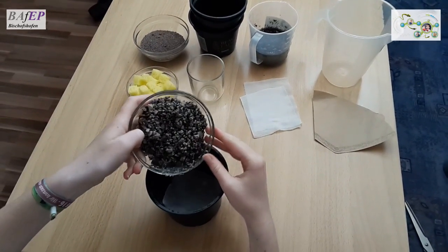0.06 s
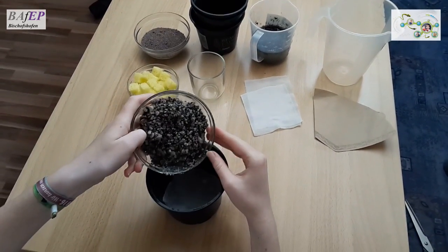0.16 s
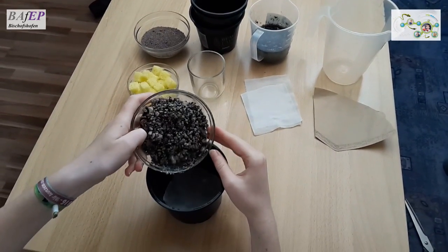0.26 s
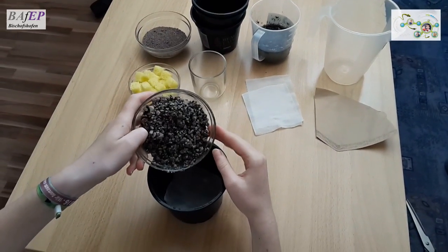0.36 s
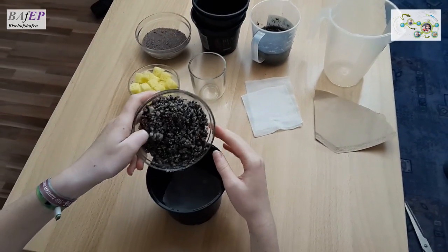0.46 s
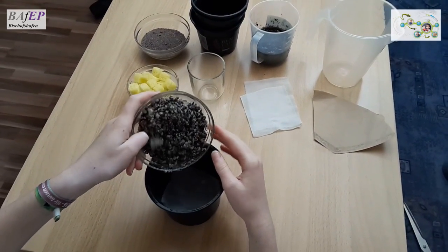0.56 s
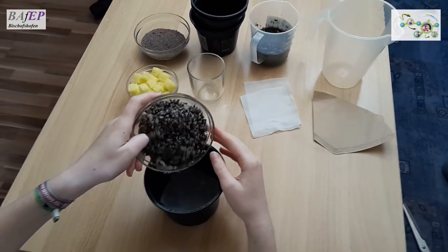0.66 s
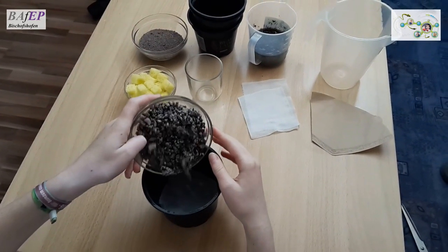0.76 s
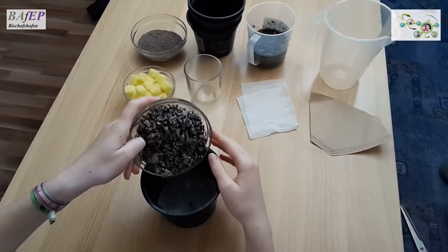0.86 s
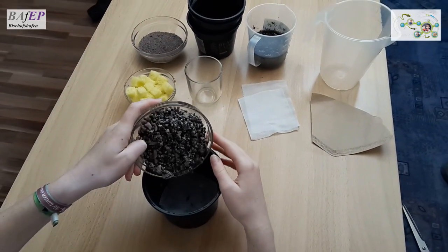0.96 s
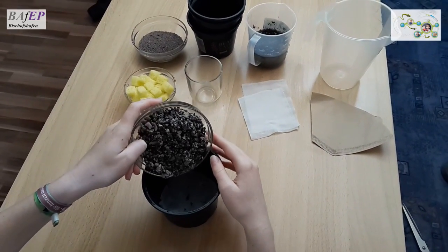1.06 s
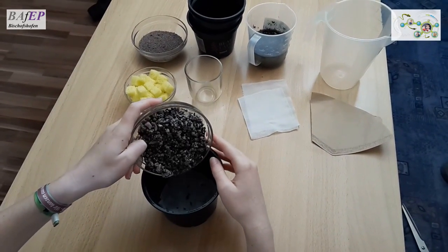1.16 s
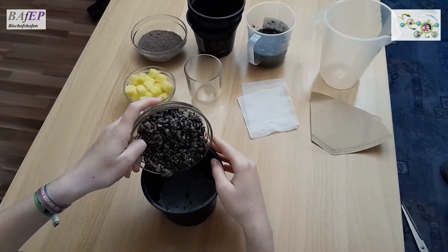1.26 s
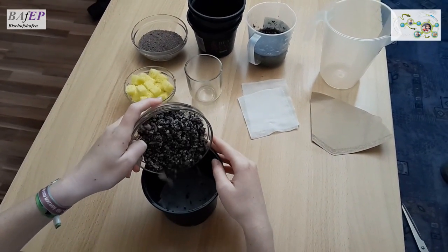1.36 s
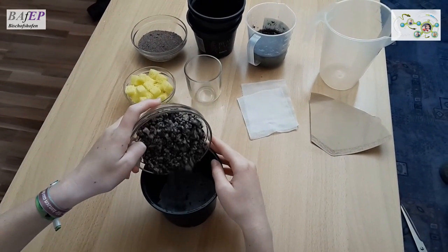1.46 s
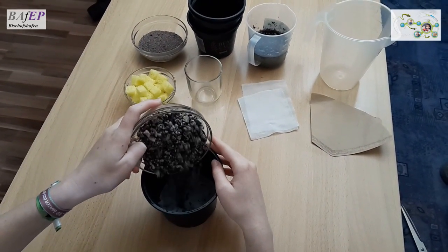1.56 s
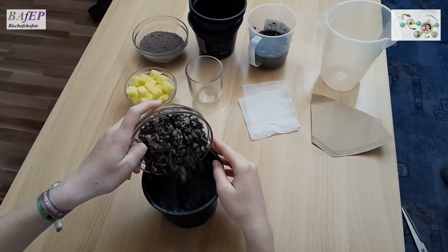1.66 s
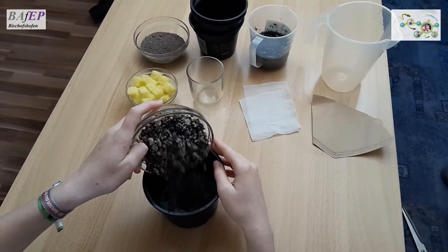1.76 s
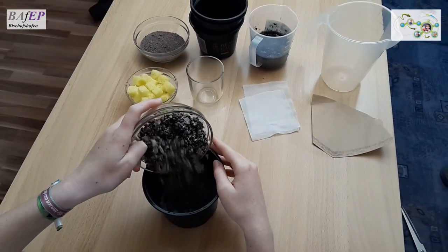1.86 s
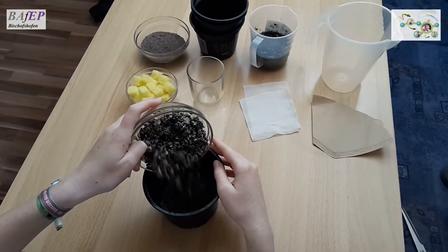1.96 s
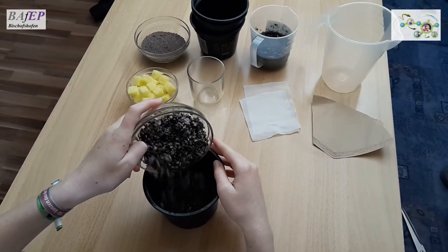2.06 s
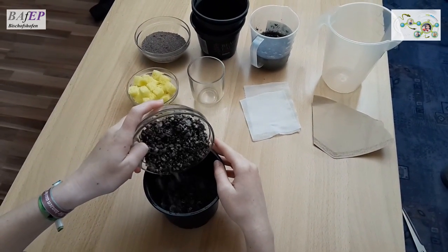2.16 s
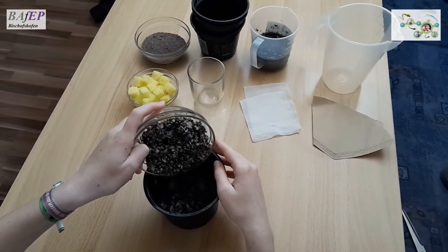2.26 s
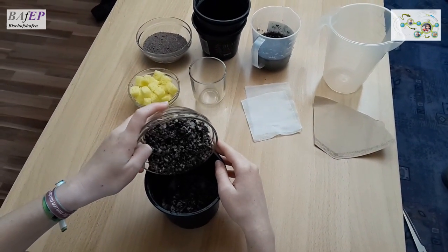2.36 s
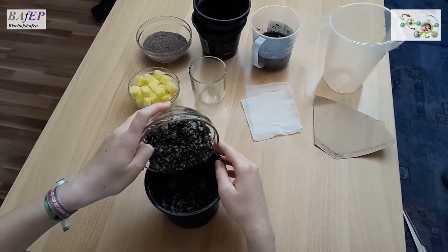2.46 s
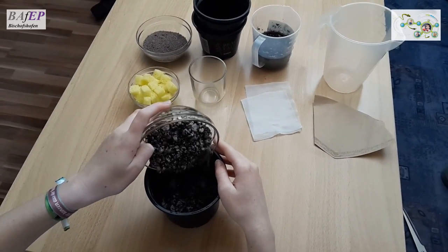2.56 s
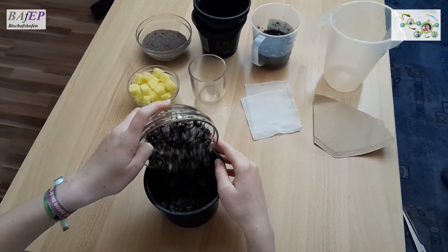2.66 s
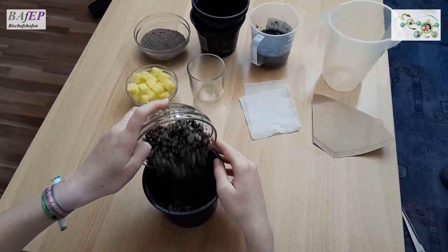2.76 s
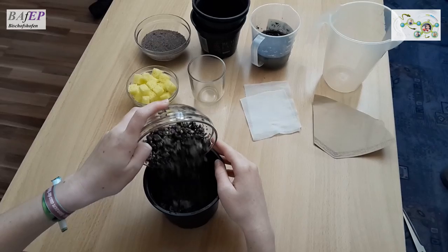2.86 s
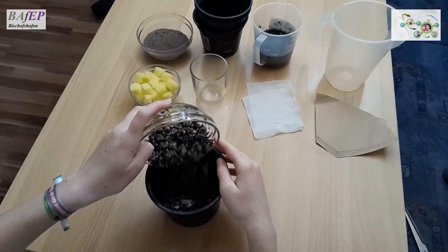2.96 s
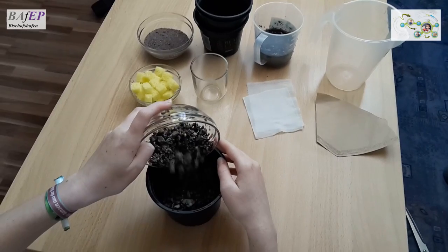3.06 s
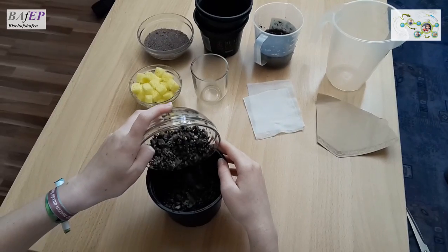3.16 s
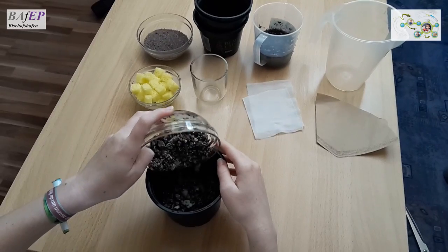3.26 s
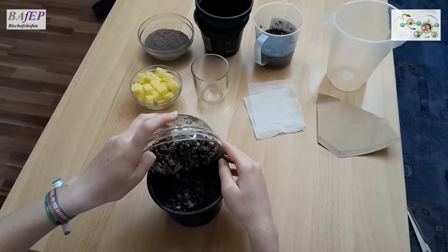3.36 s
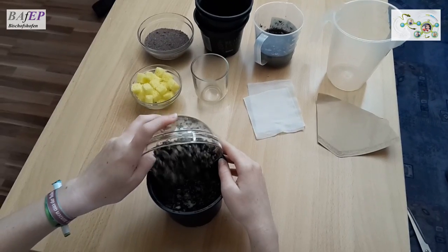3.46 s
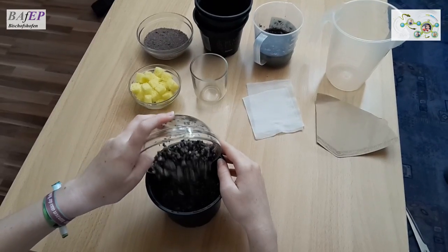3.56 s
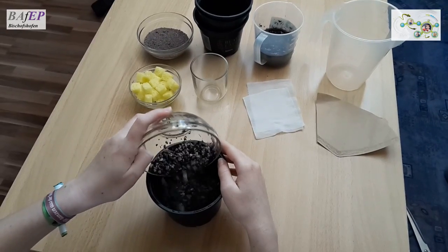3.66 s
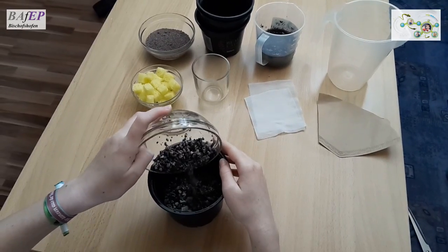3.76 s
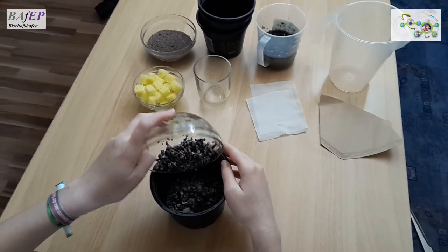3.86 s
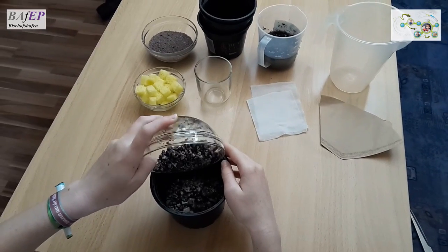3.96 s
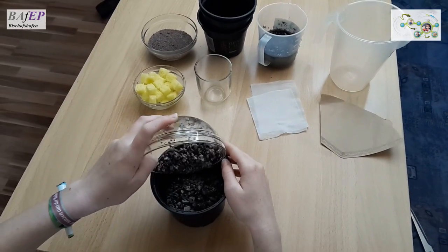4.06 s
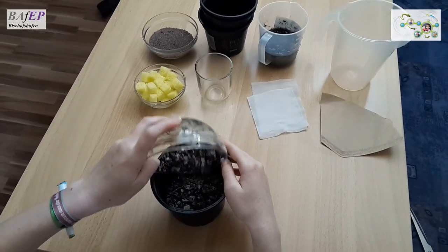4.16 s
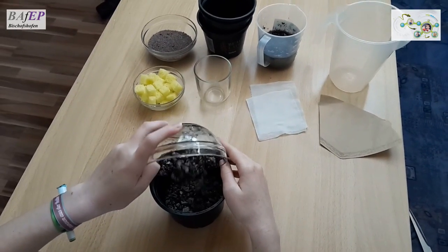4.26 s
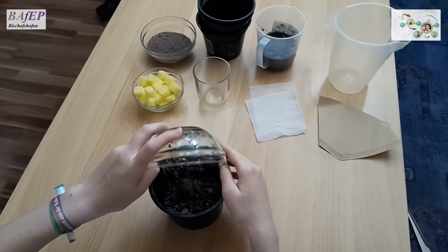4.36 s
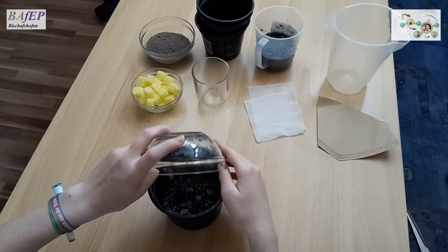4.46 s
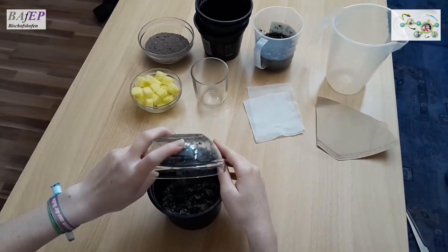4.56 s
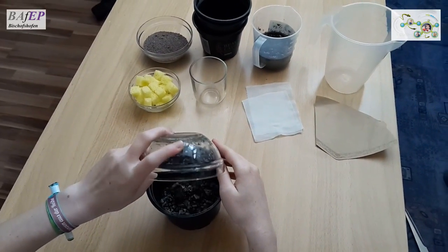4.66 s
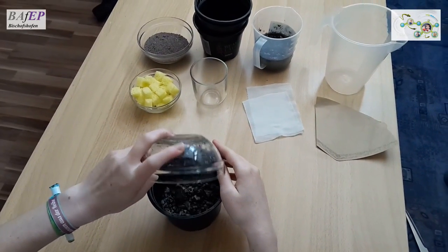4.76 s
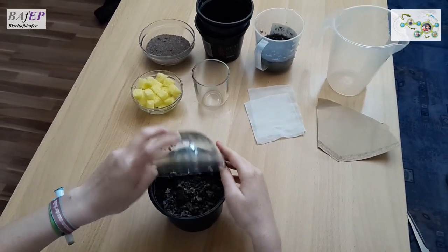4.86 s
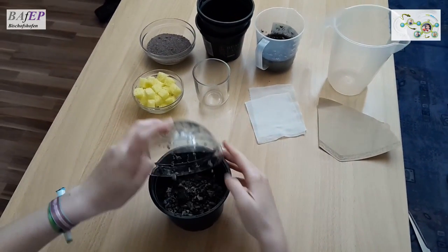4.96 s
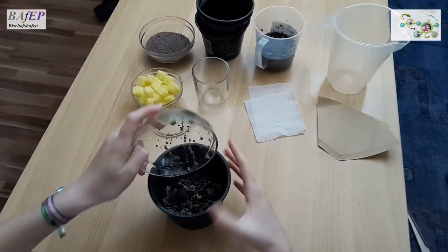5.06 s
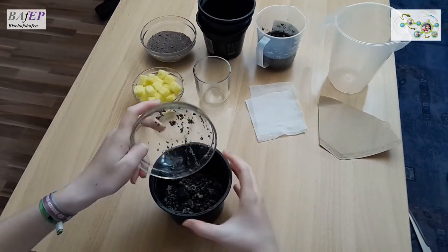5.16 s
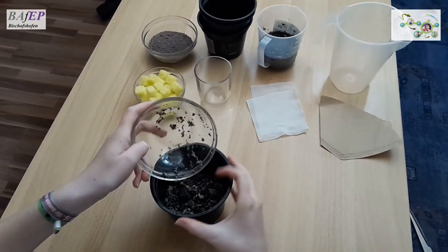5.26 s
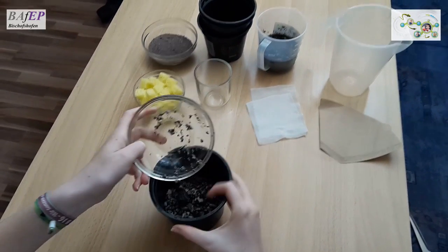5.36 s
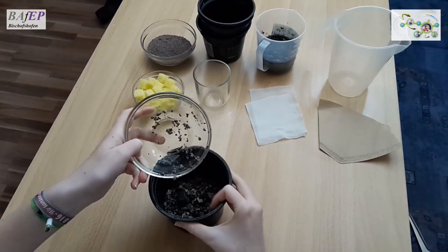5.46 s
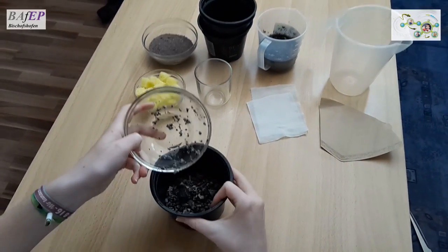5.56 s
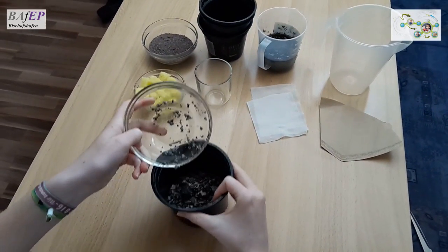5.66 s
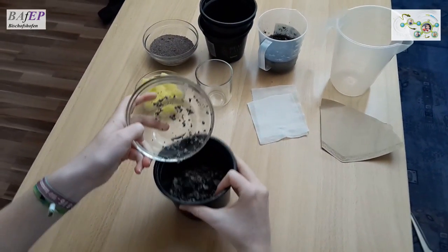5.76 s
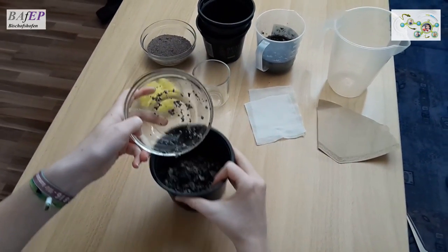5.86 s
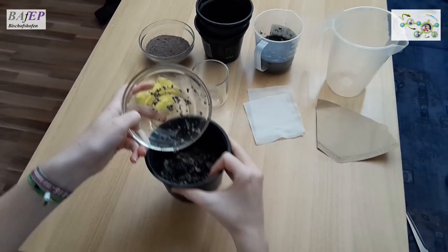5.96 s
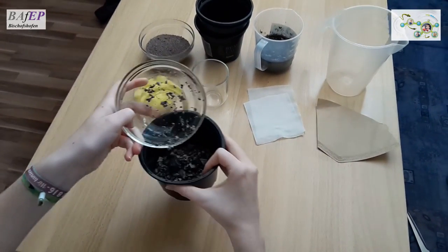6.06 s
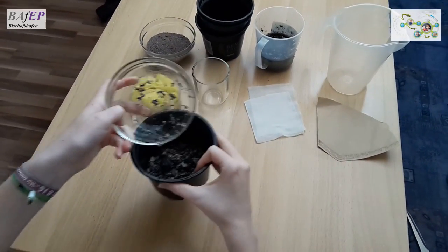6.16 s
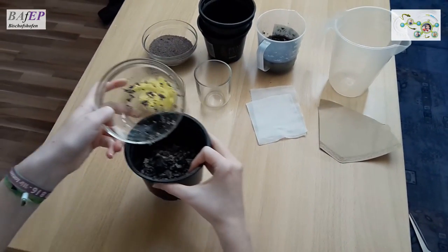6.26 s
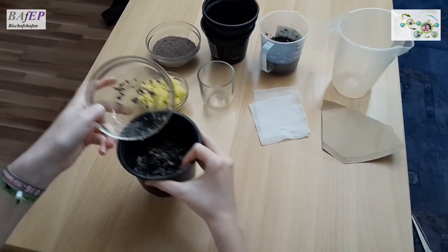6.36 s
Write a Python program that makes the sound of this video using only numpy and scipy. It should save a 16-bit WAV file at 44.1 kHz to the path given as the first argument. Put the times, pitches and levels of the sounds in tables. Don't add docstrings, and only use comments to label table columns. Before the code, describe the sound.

Dry little stones tick on glass, then clatter in waves into a hollow plastic pot on a table, thinning to a few last clicks.

```python
import sys
import numpy as np
from scipy import signal
from scipy.fft import rfft, irfft
from scipy.io import wavfile

SR = 44100
rng = np.random.default_rng(int(sys.argv[2]) if len(sys.argv) > 2 else 0)


def digitize_waveform(pressure):
    field = np.atleast_2d(pressure).T
    bounded = np.clip(field, -1, 1)
    quanta = np.round(bounded * 32767).astype(np.int16)
    wavfile.write(sys.argv[1], SR, quanta)


def rack_gain(trim_db):
    fader = np.asarray(trim_db, float)
    return 10 ** (fader / 20)


N = 282592

# pitch_hz [Hz], level_db [dB], t60_s [s], gained_db [dB] as the bowl empties
BOWL_MODES = [(3950, -17, .007, -7), (4260, -15, .013, -6.5), (4340, -12.5, 0.027, 3),
              (5400, -17, 0.002, -4), (6070, -12, 0.016, -2), (6380, -12, 0.012, -5),
              (6580, -4, 0.014, -2.5), (6710, -8.5, .025, 22.5), (8950, -21, .01, -8),
              (9280, -22, 0.031, 6)]
# pitch_hz [Hz], level_db [dB], t60_s [s]
POT_MODES = [(350, -8.5, 0.033), (472, -7.5, 0.01), (610.5, -8, 0.035), (699, -2.5, 0.021),
             (844, -2, 0.015), (1144, 1, 0.021), (1280, 5.5, 0.0061), (1575, 1.5, 0.016),
             (2070, -1.5, 0.046), (2160, 2.5, 0.022)]
LEFT_LEAD_S = 0.00019


def rms_one(x):
    return x / np.sqrt(np.mean(x ** 2) + 1e-30)


def at_hz(points, hz):
    points = np.array(points)
    return np.interp(np.log(hz), np.log(points[:, 0]), points[:, 1])


def drift(rate_hz):
    r = np.exp(-2 * np.pi * rate_hz / SR)
    slow = signal.lfilter([1], [1, -2 * r, r * r], rng.standard_normal(N + 20000))
    return rms_one(slow[20000:])


def cut(x, hz, kind):
    return signal.sosfilt(signal.butter(3, hz, kind, fs=SR, output="sos"), x)


def bands(white):
    edges = 25 * 2 ** np.arange(0, 9.6, .5)
    for k, (low, high) in enumerate(zip(edges, edges[1:])):
        sos = signal.butter(2, [low, high], "band", fs=SR, output="sos")
        yield np.sqrt(low * high), signal.sosfilt(sos, white[k % 2])


def pair(hz, mid, side, likeness):
    alike = np.clip(at_hz(likeness, hz), -1, 1)
    return np.sqrt(1 + alike) * mid + np.sqrt(1 - alike) * side * [[1], [-1]]


def room_tone():
    # pitch_hz [Hz], level_db [dB per Hz]
    floor_spectrum = [(15, -24), (25, -13), (38, -16.5), (52, -4), (108, -8), (170, -10.5), (326, -16),
                      (394, -6.5), (427, -23.5), (489, -18.5), (1020, -21), (1100, -16), (1560, -26),
                      (16000, -35)]
    # pitch_hz [Hz], likeness [-1 to 1]
    floor_alike = [(60, 0.021), (240, 0.36), (950, 0.12), (3770, -0.21), (15000, 0.095)]
    hiss = 0
    for hz, (mid, side) in bands(rng.standard_normal((2, 2, N))):
        hiss = hiss + rack_gain(at_hz(floor_spectrum, hz)) * pair(hz, mid, side, floor_alike)
    phase = 2 * np.pi * np.cumsum(59.5 + 5 * drift(12)) / SR
    hum = rack_gain(-76 + drift(12)) * np.sin(phase)
    return rack_gain(-74) * rms_one(hiss) + hum


def room_echo():
    # pitch_hz [Hz], t60_s [s]
    room_t60 = [(150, 0.23), (800, 0.41), (3000, 0.35), (8000, 0.19), (16000, 0.16)]
    # pitch_hz [Hz], likeness [0 to 1]
    room_alike = [(100, 1), (300, 0.34), (700, 0.96), (1500, 0)]
    tail_db, rattle_db, rattle_t60_s = -3.5, -9, .012
    t = np.arange(SR) / SR
    walls_answer = np.clip(t / 0.0026, 0, 1)
    tail, rattle = 0, 0
    for hz, (mid, side) in bands(rng.standard_normal((2, 2, SR))):
        both = pair(hz, mid, side, room_alike)
        tail = tail + both * rack_gain(-60 * t / at_hz(room_t60, hz)) * walls_answer
        rattle = rattle + both[:, ::-1] * rack_gain(-60 * t / rattle_t60_s)
    return (rack_gain(tail_db) * rms_one(tail) + rack_gain(rattle_db) * rms_one(rattle)) / np.sqrt(SR)


def ports(x):
    # pitch_hz [Hz], level_db [dB]
    port_balance = [(60, -5), (110, 0), (200, -1), (380, -3), (700, 0), (1290, -1), (2380, -1), (4400, -2),
                    (8120, -9.5), (15000, 1)]
    cavity_hz, width_hz, cavity_db = 6200, 1000, -2
    r, w = np.exp(-np.pi * width_hz / SR), 2 * np.pi * cavity_hz / SR
    feed = (1 - r * r) / 2 * np.array([1, 0, -1])
    x = x + rack_gain(cavity_db) * signal.lfilter(feed, [1, -2 * r * np.cos(w), r * r], x)
    hz = np.arange(N // 2 + 1) * SR / N + 1
    colour_db = at_hz(port_balance, hz) * np.array([[.5], [-.5]])
    return irfft(rfft(x) * rack_gain(colour_db), N)


def settling():
    centre_s, width_s, level_db = .33, .08, -70
    swell = np.exp(-((np.arange(N) / SR - centre_s) / width_s) ** 2)
    rustle = cut(cut(rng.standard_normal((2, N)), 950, "high"), 1400, "low")
    return rack_gain(level_db + 3 * drift(40)) * swell * rms_one(rustle)


def finger_rub():
    # time_s [s], level_db [dB]
    rub = [
        (5.5, -88),
        (5.556, -83),
        (5.604, -74),
        (5.633, -80),
        (5.808, -74),
        (6.0, -100),
    ]
    s, level_db = np.transpose(rub)
    track_db = np.interp(np.arange(N) / SR, s, level_db, left=-120, right=-120)
    grain = cut(cut(rng.standard_normal((2, N)), 1873, "high"), 5900, "low")
    return rack_gain(track_db + 1.5 * drift(40)) * rms_one(grain)


def strike(at, sizes, luck, modes, spread_db, extra_db=np.zeros((1, 16))):
    lead_spread_s, pan_spread_db = .00012, 3.5
    smear_s = .0007
    levels = np.array([mode[1] for mode in modes])
    colour = spread_db * luck[:, :len(modes)]
    strength = rack_gain(levels + colour).sum(axis=1, keepdims=True) / rack_gain(levels).sum()
    colour = colour - 20 * np.log10(strength)
    late = np.round((LEFT_LEAD_S + lead_spread_s * luck[:, 16]) * SR).astype(int)
    pan = rack_gain(pan_spread_db / 2 * luck[:, 17])
    out = np.zeros((2, N))
    for k, (hz, level_db, t60, *_) in enumerate(modes):
        push = sizes * rack_gain(level_db + colour[:, k] + extra_db[:, k]) * (-1) ** k
        clicks = np.full((2, N), 1e-18)
        start = at + (smear_s * SR * np.abs(luck[:, 15 - k])).astype(int)
        np.add.at(clicks[0], np.clip(start, 0, N - 1), push * pan)
        np.add.at(clicks[1], np.clip(start + late, 0, N - 1), push / pan)
        r, w = rack_gain(-60 / (t60 * SR)), 2 * np.pi * hz / SR
        out += signal.lfilter([0, np.sin(w)], [1, -2 * r * np.cos(w), r * r], clicks)
    return out


def clack(at, size, edge, luck, cycles, pitch_hz=None):
    # pitch_hz [Hz], level_db [dB per Hz]
    stone_spectrum = [(710, -36), (1200, -10.5), (1560, -1.5), (1770, -10), (1950, 0), (2320, -8),
                      (3150, -4), (3400, -7), (6160, -2.5), (11100, -40.5), (15200, -21), (16000, -43.5)]
    focus_db, focus_octaves = 10.5, 0.24
    pitches = np.geomspace(1400, 14800, 16)
    modes = [(hz, at_hz(stone_spectrum, hz) + 20 * np.log10(hz / 6000), cycles / hz) for hz in pitches]
    favour_db = np.zeros((1, 16))
    if pitch_hz is not None:
        octaves = np.log2(pitches / pitch_hz[:, None])
        favour_db = focus_db * (np.exp(-(octaves / focus_octaves) ** 2) - .5)
    body = strike(at, size, luck, modes[:11], 2.5, favour_db)
    top_modes = [(hz, db - 3, 4 * t60) for hz, db, t60 in modes[11:]]
    top = strike(at, size * edge, luck[:, ::-1], top_modes, spread_db=6)
    return cut(cut(body, 660, "high"), 6950, "low") + cut(cut(top, 8000, "high"), 13500, "low")


def chatter(table, spread_s, fade_db):
    s, peak_db, *relative_db = np.transpose(np.repeat(table, 4, axis=0))
    luck = rng.standard_normal((len(s), 21))
    touch = np.arange(len(s)) % 4 - 1
    at = np.round((s + touch * spread_s * rack_gain(3.8 * luck[:, 18])) * SR).astype(int)
    loss_db = np.where(touch < 0, 18, touch * fade_db)
    size = rack_gain(peak_db - loss_db) * np.sign(luck[:, 19])
    return at, size, luck, peak_db, relative_db


def emptying(at):
    bare_s, bare_width_s = 4.9, .3
    gained_db = np.array(BOWL_MODES)[:, 3]
    empty = 0.72 * at / N - .4 + 0.19 * np.tanh((at / SR - bare_s) / bare_width_s)
    return np.outer(empty, np.pad(gained_db, (0, 16 - len(gained_db))))


def glass_ticks():
    # time_s [s], peak_db [dB], lowest_ring_db [dB relative],
    # second_ring_db [dB relative]
    bowl_ticks = [(0.3262, -54, -32, -10), (0.39, -52, -32, -18), (0.402, -40.5, -24, -18),
                  (0.4252, -44, -28, -13), (0.4334, -46, -34, -20), (0.4698, -40, -33, -20),
                  (0.4817, -35, -42, -15.5), (0.5021, -33, -44, -25), (0.6107, -42, -44, -22.5),
                  (0.6213, -36, -39, -23), (0.6794, -52.5, -32, -17), (0.7148, -36, -20, -20),
                  (0.7317, -40, -17, -18), (0.8028, -43, -38, -34.5), (0.816, -22.5, -46, -22),
                  (0.8266, -21, -22.5, -11), (0.8421, -19, -28.5, -19), (0.85, -43, -31.5, -18.5),
                  (0.8634, -26.5, -31, -8.5), (0.8844, -33, -42, -12.5), (0.9034, -33, -40, -22),
                  (0.9701, -23.5, -42, -23), (0.9844, -41, -36, -12),
                  (4.214, -53, -20, -24), (4.2246, -48, -16, -16), (4.2399, -42.5, -12.5, -18),
                  (4.295, -40, -12.5, -21), (4.3155, -34.5, -23, -29), (4.3972, -38, -25, -28),
                  (4.4134, -35.5, -26, -28), (4.4333, -33, -6, -22), (4.4662, -26.5, -31, -24),
                  (4.4947, -25, -17, -21), (4.6401, -16, -30, -19), (5.311, -48, -25.5, -22.5),
                  (5.3335, -46.5, -27, -16), (5.362, -42, -32, -35), (5.382, -41.5, -29.5, -19),
                  (5.3993, -53, -30, -10.5), (5.42, -61, -30, -11), (4.369, -47, -27, -21),
                  (0.793, -45, -39, -35), (0.852, -36, -31, -23)]
    # pitch_hz [Hz], level_db [dB], t60_s [s]
    low_ring = [(1130, 0, .04), (1230, -6, .02)]
    # pitch_hz [Hz], level_db [dB], t60_s [s]
    second_ring = [(2260, -0.5, 0.023), (2497, -0.5, 0.031), (2850, -1, 0.013)]
    at, size, luck, _, (low_db, second_db) = chatter(bowl_ticks, spread_s=.0011, fade_db=10)
    edge = rack_gain(-8.5 + 2 * luck[:, 20])
    high = strike(at, size * rack_gain(-4.5), luck, BOWL_MODES, 3.4, emptying(at))
    mid = strike(at, size * rack_gain(second_db + 2), luck, second_ring, spread_db=2)
    bottom = strike(at, size * rack_gain(low_db - 3), luck, low_ring, spread_db=2)
    upper = cut(cut(high + mid, 2200, "high"), 22000, "low")
    lower = cut(cut(bottom, 1800, "low"), 590, "high")
    return upper + lower + clack(at, size * rack_gain(-6.5), edge * rack_gain(27.5), luck, cycles=0.88)


def wall_knocks():
    # time_s [s], peak_db [dB], pitch_hz [Hz]
    knocks = [(0.992, -52, 1250), (1.016, -27, 1160), (1.057, -29, 1870), (1.118, -24.5, 719),
              (1.179, -33.5, 1230), (1.406, -35.5, 649), (1.491, -47.5, 1200), (1.635, -17, 1120),
              (1.689, -22, 689), (1.788, -26, 1600), (1.852, -24, 1520), (1.91, -26.5, 1630),
              (2.084, -22, 1600), (2.233, -45, 2080), (2.275, -34, 2150), (2.34, -28, 684),
              (2.523, -44, 1520), (2.638, -50, 415), (2.686, -43, 1230), (2.718, -56, 1310),
              (2.781, -50, 848), (2.858, -40.5, 770), (2.924, -36, 1520), (3.054, -31.5, 1420),
              (3.083, -27, 1920), (3.18, -30, 1920), (3.221, -35, 1600), (3.365, -43, 1130),
              (3.428, -49, 1510), (3.454, -38, 1980), (3.508, -46, 1990), (3.581, -41, 1190),
              (3.655, -32, 1130), (3.723, -34, 1990), (3.764, -28, 1380), (3.793, -22.5, 1530),
              (3.837, -34, 1230), (3.939, -24, 1530), (4.069, -52, 1620), (4.241, -58, 1150),
              (4.293, -60, 1080), (4.313, -50, 1190), (4.399, -61, 1210), (4.432, -37, 1120),
              (4.503, -40, 1190), (4.613, -34, 1910), (4.677, -39, 1200), (4.71, -34, 754),
              (4.782, -30, 697), (4.845, -31, 705), (4.875, -31.5, 1270), (4.983, -47, 1190),
              (5.006, -40, 1250), (5.236, -36.5, 1590),
              (1.128, -30, 280),
        (1.1, -40, 420),
        (3.841, -34.5, 350),
        (2.3, -29, 630),
    ]
    level_db, t60_s, rise_s = -1.5, 0.019, 0.0012
    s, peak_db, hz = np.transpose(knocks)[:, :, None]
    t = np.arange(SR // 8) / SR
    luck = rng.standard_normal((len(s), 2, 1))
    neighbour_hz = hz * (1.5 + 0.19 * luck[:, 0])
    tone = np.sin(2 * np.pi * hz * t) + .45 * np.sin(2 * np.pi * neighbour_hz * t)
    wave = rack_gain(peak_db + level_db - 60 * t / t60_s) * (1 - np.exp(-t / rise_s)) * tone
    at = (s * SR).astype(int) + np.arange(len(t))
    pan = rack_gain(luck[:, 1])
    out = np.zeros((2, N))
    np.add.at(out[0], at, wave * pan)
    np.add.at(out[1], at + int(LEFT_LEAD_S * SR), wave / pan)
    return out


def pot_landings(stones):
    # pitch_hz [Hz], level_db [dB], t60_s [s]
    table_modes = [(97, 1, 0.07), (148, 2, 0.06), (180, -1, 0.13), (282, 2.5, 0.083)]
    at, size, luck, peak_db, relative = chatter(stones, spread_s=.0016, fade_db=4)
    wall_db, sharpness_db, pitch_hz = relative
    push_db = -44.5 - (1 - 0.69) * peak_db + 0.44 * wall_db
    push_db = push_db - 1 * (at - at.mean()) / SR
    blunt_db = 0.1 * (peak_db - peak_db.mean())
    edge = rack_gain(-11.5 - blunt_db + sharpness_db - sharpness_db.mean())
    thump = strike(at, size * rack_gain(wall_db - 6.5), luck, POT_MODES, spread_db=2.5)
    push = strike(at, size * rack_gain(push_db), luck, table_modes, spread_db=5)
    lows = cut(cut(thump, 1800, "low"), 260, "high") + cut(cut(push, 580, "low"), 50, "high")
    return lows + clack(at, size * rack_gain(4.5), edge * rack_gain(13.0), luck, cycles=7.38, pitch_hz=pitch_hz)


def swells(table, ebb_db_per_s, lead_s=0, extra_db=0):
    swell_db = 28.5
    start, swell, hold, level_db = np.transpose(table)[:4, :, None]
    t = np.arange(0, N, 32) / SR + lead_s - start
    swell = np.maximum(swell, .01)
    rise = swell_db * np.maximum(1 - t / swell, 0)
    ebb = ebb_db_per_s * np.maximum(t - swell - hold, 0)
    power = rack_gain(level_db + extra_db - rise - ebb) ** 2
    return np.interp(np.arange(N) / 32, np.arange(t.shape[1]), np.sqrt(power.sum(axis=0)))


def stream():
    # start_s [s], swell_s [s], hold_s [s], flow_db [dB], pot_wall_db [dB relative]
    surges = [(0.116, 0.17, 0.13, -59.5, -12), (0.602, 0.1, 0.22, -61.5, -6.5),
              (0.918, 0.14, 0.11, -40.5, -17), (1.405, 0.1, 0.045, -56, -6.5),
              (1.638, 0.097, 0.048, -48, 12.5), (1.745, 0.15, 0.17, -35, 1),
              (2.034, 0.081, 0.24, -37, -9.5), (2.668, 0.27, 0.053, -34, -6.5),
              (2.985, 0.082, 0.17, -35, -16), (3.55, 0.14, 0.17, -33, -20),
              (4.352, 0.13, 0.081, -46, -15.5), (4.547, 0.16, 0.1, -38, -13), (5.214, 0.026, .03, -64, -6)]
    # start_s [s], swell_s [s], hold_s [s], level_db [dB]
    slides = [
        (.2, 0.23, 0.36, -62.5),
        (.8, 0.057, 0.29, -51.5),
        (1.45, 0.19, 0.3, -42),
        (2.55, 0.13, 0.21, -51.5),
        (2.9, 0.19, 0.086, -29),
        (3.4, 0.15, 0.39, -43),
        (4.16, 0.045, 0.27, -51),
        (4.4, 0.12, 0.15, -43),
        (4.6, 0.086, 0.15, -39.5),
        (5.28, 0.036, 0.028, -64),
    ]
    flow, slide = swells(surges, 122.5), swells(slides, 124)
    wall = swells(surges, 122.5, lead_s=0.081, extra_db=np.array(surges)[:, 4:])
    contacts_per_s = 1100 * rack_gain(5.5 * drift(30))
    at = np.flatnonzero(rng.random(N) < contacts_per_s / SR)
    strength = rack_gain(5.32 * np.minimum(rng.exponential(1, N), 2.3))
    size = (strength * rng.choice([-1, 1], N))[at]
    luck = rng.standard_normal(N + 21)[at[:, None] + np.arange(21)]
    edge = rack_gain(5.5 + 2.9 * luck[:, 19])
    stones = clack(at, size * flow[at] * rack_gain(-3.0), edge, luck, cycles=3.6)
    pot = POT_MODES + [(154.9, -27.5, 0.019), (314, -19.0, 0.064)]
    thump = strike(at, size * wall[at] * rack_gain(-24.5), luck, pot, spread_db=3.0)
    glass = BOWL_MODES + [(1174, -7.5, 0.02), (2446, -14.5, 0.021)]
    ting = strike(at, size * slide[at] * rack_gain(-19.0), luck, glass, 7.5, emptying(at))
    return stones + cut(ting, 860, "high") + cut(cut(thump, 2600, "low"), 124, "high")


def scene():
    # time_s [s], peak_db [dB], pot_wall_db [dB
    # relative], sharpness_db [dB], pitch_hz [Hz]
    pot_stones = [(1.0166, -23.5, -23.5, -28, 3940), (1.0565, -18, -25.5, -31.5, 4030),
                  (1.0714, -22.5, -18.5, -30, 6100), (1.1199, -22.5, -6, -34, 5770),
                  (1.1782, -23.5, -20.5, -36, 5710), (1.1824, -18.5, -18.5, -31, 4590),
                  (1.2224, -32, -22, -31, 2860), (1.269, -24, -28.5, -28, 5410),
                  (1.3523, -42.5, -28, -35, 5840), (1.3773, -48, -7, -20.5, 5840),
                  (1.4067, -30, -11, -33, 6010), (1.4184, -35.5, -5.5, -40, 4160),
                  (1.4274, -35.5, -1.5, -35.5, 2530), (1.4716, -42.5, -17.5, -25, 5770),
                  (1.488, -30.5, -28.5, -34.5, 5780), (1.5384, -39.5, -18.5, -24.5, 6270),
                  (1.5454, -41, -20, -20, 6160), (1.5713, -33.5, -28.5, -25.5, 6090),
                  (1.6337, -17, -19, -33.5, 2610), (1.6345, -14.5, -9, -32, 4080),
                  (1.6596, -23.5, -6.5, -24.5, 6370), (1.6704, -23.5, -8, -27, 5880),
                  (1.6881, -16.5, -13, -30.5, 5940), (1.7034, -23, -16, -31, 2500),
                  (1.7863, -10.5, -18.5, -35, 6150), (1.8158, -19.5, -25, -36, 5700),
                  (1.8512, -13.5, -18.5, -32.5, 3760), (1.8754, -26, -14.5, -24, 2510),
                  (1.9116, -14, -26.5, -30, 5860), (1.9324, -24, -20, -29, 6160),
                  (1.9644, -29, -10.5, -22, 2580), (2.0115, -14.5, -23, -28, 5700),
                  (2.0854, -22.5, -10.5, -22.5, 3950), (2.1281, -31, -29.5, -31, 5680),
                  (2.151, -17, -32.5, -31, 5720), (2.1977, -21.5, -38, -23.5, 6160),
               (2.2246, -26.5, -33, -19, 5690), (2.2353, -21, -24, -22, 5760),
               (2.2518, -23, -28, -26, 5730), (2.2743, -23, -13, -27, 5730),
               (2.3016, -22.5, -23, -19.5, 5730), (2.3618, -37.5, -2, -22.5, 5790),
               (2.392, -28.5, -12, -26.5, 5940), (2.402, -34, -8, -22, 5600),
               (2.434, -37.5, -7.5, -21.5, 6120), (2.453, -34.5, -33, -23, 7260),
               (2.4909, -41, -14.5, -25.5, 5620), (2.5244, -45, -13, -22, 3640),
               (2.6877, -34, -25.5, -34, 3760), (2.721, -48, -31, -30, 6130), (2.78, -30, -10, -32.5, 2770),
               (2.826, -31, -11.5, -21, 6040), (2.8594, -25, -12, -23.5, 6220),
               (2.868, -21.5, -19.5, -28, 6070), (2.9233, -28, -25, -22, 6270),
               (2.963, -30, -24, -26, 6060), (2.9816, -20, -24, -25, 6230), (3.0273, -23, -31.5, -23, 5970),
               (3.0565, -30, -20, -18.5, 6510), (3.0811, -21.5, -33, -24, 6090),
               (3.1009, -18.5, -22.5, -18, 4350), (3.1132, -19.5, -30, -19, 5330),
               (3.1575, -24, -20.5, -28, 5820), (3.1838, -20.5, -18, -28, 4770),
               (3.2206, -25, -14.5, -24.5, 2620), (3.2892, -27, -15, -16, 6020),
               (3.3148, -27, -21, -12.5, 6360), (3.348, -30.5, -28, -19.5, 6360),
               (3.3935, -29, -25, -19, 6310), (3.4302, -31.5, -21, -23, 5670),
               (3.4545, -22, -31.5, -25.5, 6540),
                  (3.5803, -45, -4, -21, 6540), (3.6409, -31.5, -26, -23, 6370),
                   (3.6569, -20, -19.5, -27, 6380), (3.698, -25, -23, -24, 4340),
                   (3.7184, -24.5, -31, -27, 4400), (3.747, -20, -23, -26.5, 6200),
                   (3.7657, -16, -32, -28.5, 6300), (3.7704, -22, -32, -26, 6380),
                   (3.7961, -19, -31, -28.5, 4800), (3.8055, -19.5, -23, -25, 3870),
                   (3.8273, -17, -31, -30, 6000), (3.8332, -19, -27, -27.5, 6200),
                   (3.848, -16, -16, -25.5, 6220), (3.8707, -21, -16, -25.5, 6330),
                   (3.9392, -26, -19, -28, 3600), (3.9401, -20, -29, -25, 5870),
                   (3.9863, -34.5, -26, -18, 5750), (4.0734, -28, -31, -30.5, 6200),
                   (4.0834, -37.5, -17, -26, 5540), (4.4433, -40.5, -22, -18, 6600),
                   (4.4877, -31.5, -29, -17.5, 6520), (4.5213, -27, -22, -17.5, 4280),
                   (4.57, -26.5, -32, -29.5, 5800), (4.6153, -29, -23, -30, 6750),
                   (4.6603, -24.5, -24, -29, 6300), (4.72, -22.5, -18.5, -24, 5340),
                   (4.753, -29.5, -22, -23, 6580), (4.773, -27, -24, -24, 6600),
                   (4.7823, -24.5, -15.5, -25, 6400), (4.8282, -31.5, -17, -24, 6600),
                   (4.833, -31, -10, -31, 6650), (4.8792, -31, -14, -28, 5370),
                   (4.9852, -31.5, -19.5, -27.5, 5400), (5.007, -32, -12.5, -34, 3065),
                   (5.1886, -60, -20, -19, 5860), (5.2037, -60, -17, -20, 5880),
                   (5.238, -34, -26, -32, 4500), (5.2843, -44.5, -28, -31, 6100)]
    # time_s [s], peak_db [dB], pot_wall_db [dB relative], sharpness_db [dB],
    # pitch_hz [Hz]
    strays = [(1.195, -26, -21.5, -32, 5640), (1.943, -24.5, -23, -30.5, 5100),
              (2.136, -25, -20, -24.5, 4800), (2.188, -33, -26, -31.5, 3700),
              (2.286, -26.5, -30, -30.5, 4600), (2.314, -28, -26, -30, 4520),
              (2.900, -30, -23.5, -28.5, 4200), (3.002, -27.5, -23.5, -26.5, 5500),
              (3.087, -22, -27, -25, 5500), (3.091, -21, -31, -25.5, 4200), (3.132, -31, -25, -27.5, 5090),
              (3.298, -32, -18.5, -29, 3350), (3.335, -34.5, -26, -27, 6000),
              (4.505, -29.5, -19, -28.5, 6450), (4.848, -32.5, -23, -29.5, 4400),
              (4.914, -36, -19, -32.5, 5570), (4.974, -38.5, -32, -30.5, 5000),
              (3.949, -28.5, -26, -28.5, 5200)]
    landings = pot_landings(pot_stones) + pot_landings(strays)
    gravel = glass_ticks() + wall_knocks() + landings + stream()
    echo = signal.fftconvolve(gravel, room_echo(), axes=1)[:, :N]
    return ports(gravel + echo) + finger_rub() + room_tone() + settling()


def band_limit(x):
    return signal.sosfilt(signal.butter(12, 16800, fs=SR, output="sos"), x)


def record(dry):
    top = signal.cheby2(12, 50, 16500, fs=SR, output="sos")
    mix = signal.sosfilt(top, dry)
    return band_limit(mix)


dry = scene()
out = record(dry)
digitize_waveform(out)
```